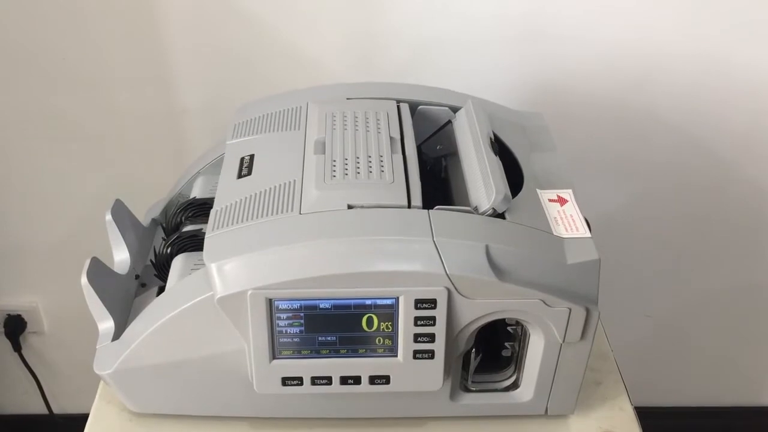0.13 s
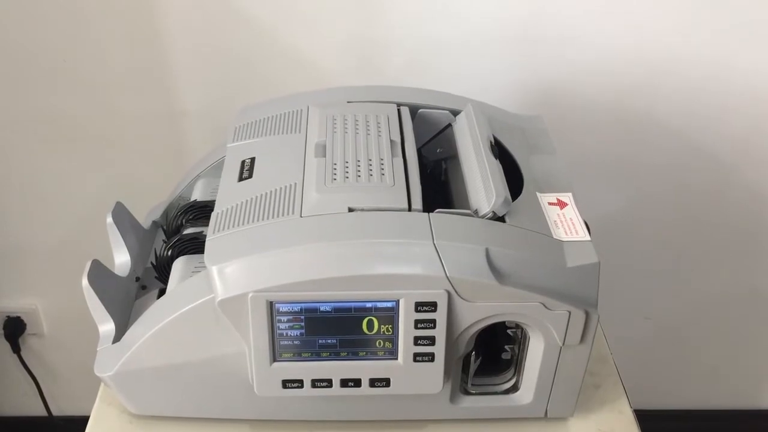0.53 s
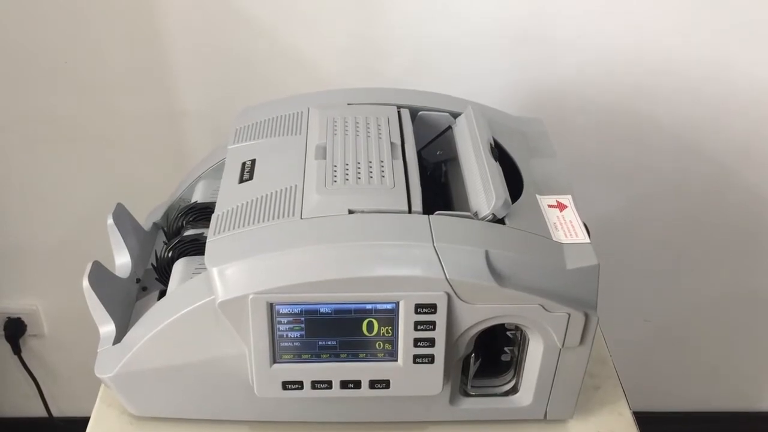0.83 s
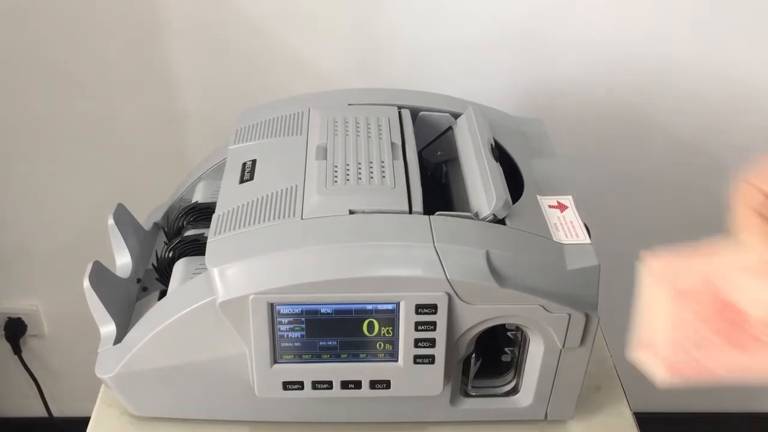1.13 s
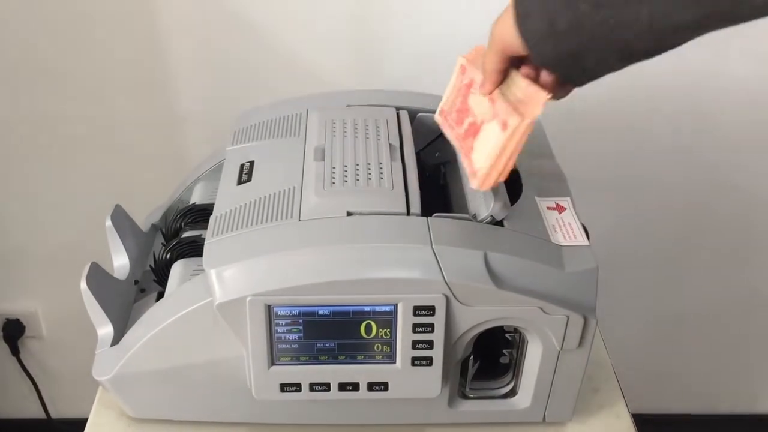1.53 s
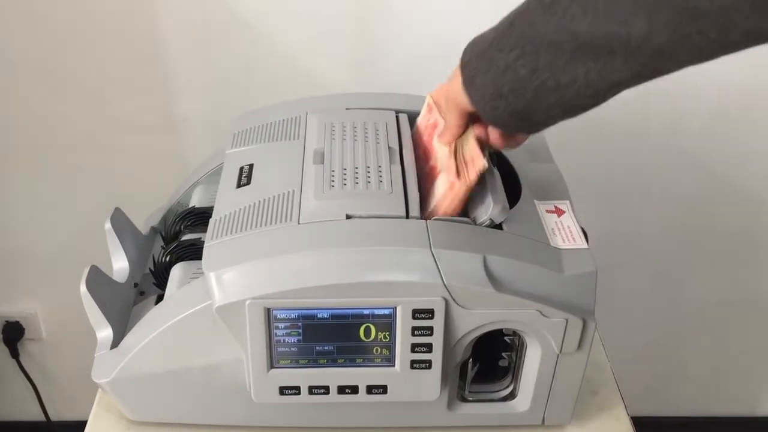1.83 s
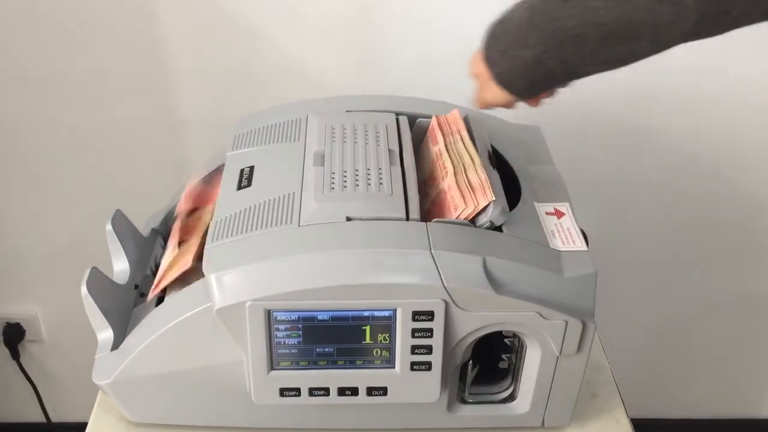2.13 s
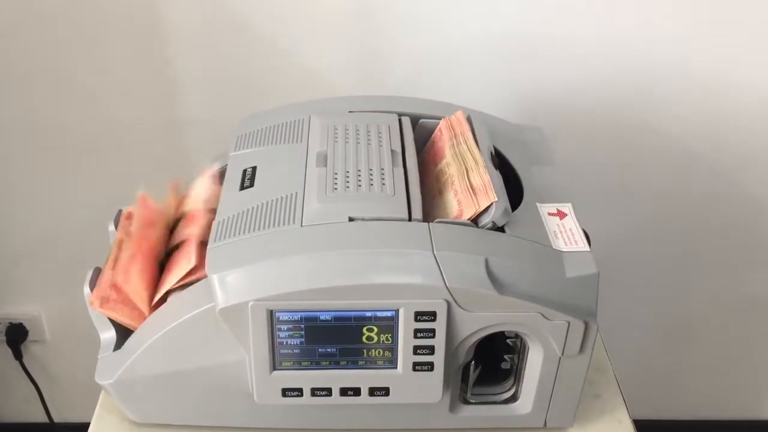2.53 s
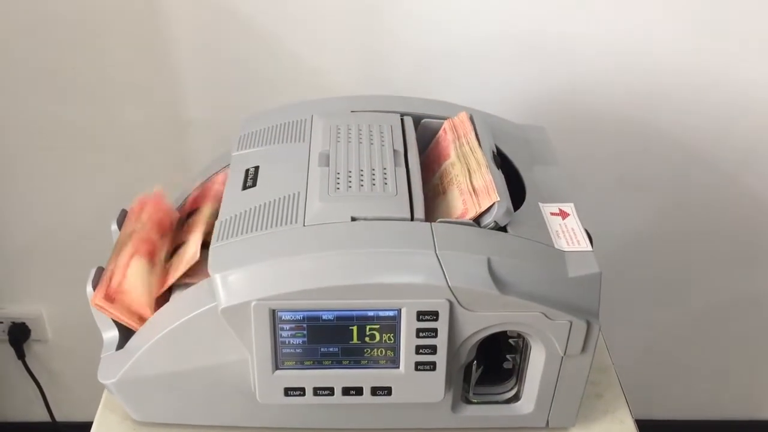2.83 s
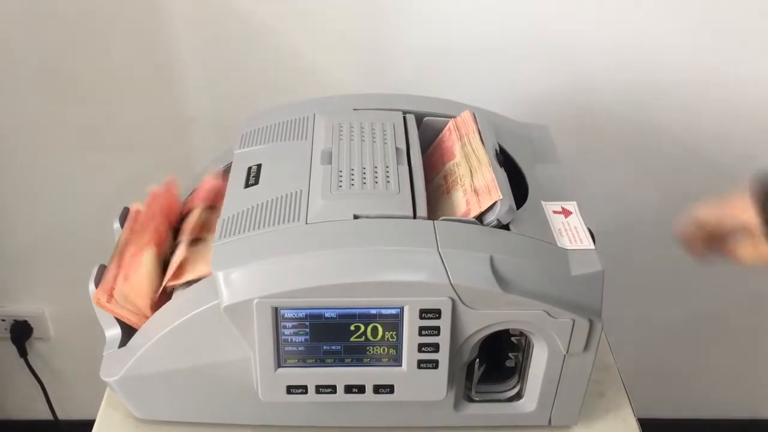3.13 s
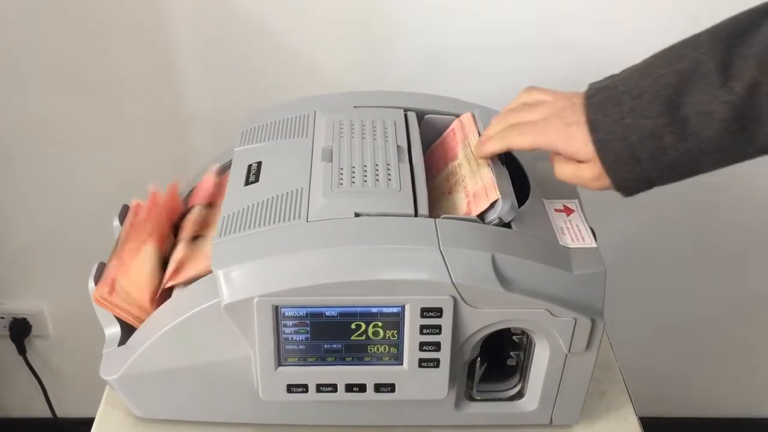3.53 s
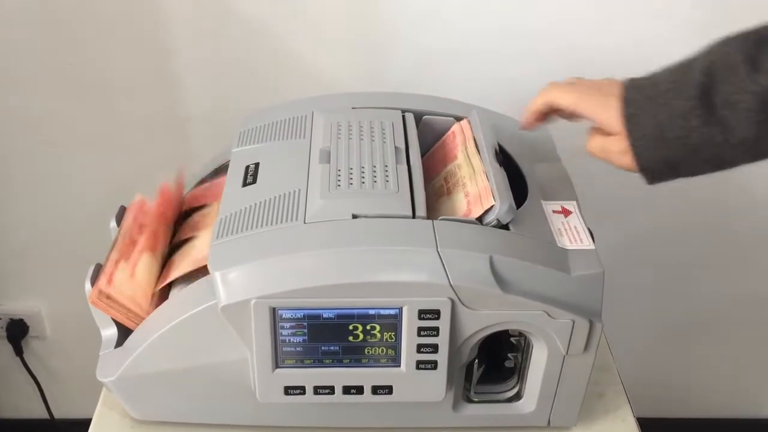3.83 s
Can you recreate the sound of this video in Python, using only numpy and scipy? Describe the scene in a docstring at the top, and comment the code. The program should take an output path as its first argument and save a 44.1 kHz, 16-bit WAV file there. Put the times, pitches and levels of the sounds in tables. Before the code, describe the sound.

Banknote counting machine: soft room hiss and slight rustle first, then two clicks, a brief chirp and motor run-up, followed by steady fast paper snaps and flutter over a low hum, close microphone, short room echo.

```python
"""First a quiet room is heard: low rumble, hiss and a faint whine, with a little rustle of notes in the hand. A
stack of banknotes clicks twice into a counter, the drive chirps and runs up, and about 18 notes a second are
pulled through. Each note snaps free (ringing tones and noise bursts), then hisses over the rollers and flutters
into the stacker wheel (coloured grains of noise). Wavering sine tones make the mains and motor hum and the
roller drone, and filtered noise makes the rumble."""
import sys
import numpy as np
from scipy import signal
from scipy.fft import rfft, irfft
from scipy.io import wavfile
from scipy.ndimage import uniform_filter1d

SR = 44100
rng = np.random.default_rng(int(sys.argv[2]) if len(sys.argv) > 2 else 0)


def file_out(sig):
    """Save sig as 16-bit WAV at sys.argv[1]."""
    # one column per channel
    cols = np.atleast_2d(sig).T
    # limit, then scale
    lim = np.clip(cols, -1, 1)
    pcm = np.round(lim * 32767).astype(np.int16)
    wavfile.write(sys.argv[1], SR, pcm)


N = 176400  # samples: 4 s


def undb(db):
    """Turns decibels into a plain multiplier."""
    return 10 ** (np.asarray(db) / 20)


def unit(x):
    """Scales x to an average (rms) level of 1."""
    return x / np.sqrt(np.mean(x ** 2) + 1e-20)


def clock():
    """The time of every sample, in seconds."""
    return np.arange(N) / SR


def ramp(start_s, length_s):
    """Rises in a straight line from 0 to 1."""
    return np.clip((clock() - start_s) / length_s, 0, 1)


def walk(rate):
    """Slow random drift with a spread near 1: held random values, smoothed twice."""
    hold = max(int(SR / rate), 2)
    steps = np.repeat(rng.standard_normal(N // hold + 1), hold)
    smooth = uniform_filter1d(uniform_filter1d(steps, hold), hold)
    return unit(smooth[:N])


def colour(x, points):
    """Filters x to a spectrum drawn through (pitch_hz, level_db) points; rms 1."""
    hz, db = np.array(points).T
    f = np.maximum(np.arange(N // 2 + 1) * SR / N, 1)
    gain = undb(np.interp(np.log(f), np.log(hz), db))
    # fade out below the first point and above the last
    edges = np.minimum(f / hz[0], 1) * np.minimum(hz[-1] / f, 1) ** 2
    return unit(irfft(rfft(x) * gain * edges, N))


def grains(spread_db):
    """Dense tiny clicks of uneven size."""
    return rng.standard_normal(N) * undb(spread_db * rng.standard_normal(N))


def flicker(x, db, rate):
    """Lets each third of an octave from 400 to 8000 Hz swell and sink on its own, so the colour keeps changing."""
    spectrum = rfft(x)
    f = np.arange(len(spectrum)) * SR / N
    band = np.round(3 * np.log2(np.clip(f, 400, 8000)))  # the end bands take in all beyond them
    return unit(sum(irfft(spectrum * (band == k), N) * undb(db * walk(rate)) for k in np.unique(band)))


def burst(hz, width_hz, decay_s):
    """A contact: noise in one resonance that starts fast and dies away."""
    t = np.arange(4096) / SR
    f = np.arange(1, len(t) // 2 + 2) * SR / len(t)
    resonance = 1 / (1 + 1j * (f - hz * hz / f) / width_hz) ** 2
    tone = irfft(rfft(rng.standard_normal(len(t))) * resonance)
    env = np.exp(-t / decay_s) * np.minimum(t / 0.00032, 1)
    return unit(tone * env) * np.sqrt(np.mean(env ** 2))


def add(out, s, x):
    """Mixes x in at s seconds."""
    i = int(np.clip(s * SR, 0, N))
    out[i:i + len(x)] += x[:N - i]


# notes pulled from the stack: start_s [s], level_db [dB, before the part levels below], pitch_hz [Hz]
NOTES = [(2.2636, -31, 5900), (2.3153, -24.5, 4510), (2.368, -15, 5130), (2.4192, -35, 6290),
         (2.4728, -17.5, 4570), (2.5267, -19, 5500), (2.579, -15.5, 5700), (2.6335, -42, 5700),
         (2.6848, -21.5, 5380), (2.7379, -16, 5400), (2.7911, -19, 5100), (2.8448, -16, 4500),
         (2.8993, -17.5, 4440), (2.9536, -12, 5300), (3.0096, -18, 4480), (3.0623, -9.5, 5630),
         (3.1182, -19, 4330), (3.1764, -21.5, 5500), (3.23, -16, 4440), (3.2855, -14.5, 5700),
         (3.3409, -23, 5260), (3.398, -23, 4490), (3.454, -11.5, 5560), (3.5103, -14.5, 4550),
         (3.568, -12, 5600), (3.6274, -17, 5500), (3.684, -36, 6100), (3.7399, -13.5, 5930),
         (3.7964, -13, 5160), (3.8513, -21, 5560), (3.907, -24, 4870), (3.9617, -14.5, 5400)]


def note_period():
    """Average time from one note to the next, in seconds."""
    return np.mean(np.diff(np.array(NOTES)[:, 0]))


def note_count():
    """Notes passed so far, rising by one from snap to snap and evenly before and after."""
    s = np.array(NOTES)[:, 0]
    t = clock()
    outside = (t - np.clip(t, s[0], s[-1])) / note_period()
    return np.interp(t, s, np.arange(len(s))) + outside


# ringing tones of the note guide: pitch_hz [Hz], level_db [dB, relative], decay_s [s]
GUIDE_TONES = [(1980, -8, 0.0019), (3880, -6.5, .0022), (4480, -3, 0.0052), (5320, -1.5, 0.0035),
               (5870, -3, 0.0031), (6700, -5, 0.0014)]
SNAP_LAG_S, RING_DB, RING_RISE_S, RING_WIDTH_HZ = 0.000977, -25.5, 0.00035, 1600
CRACK_DB, CRACK_DECAY_S = -10.5, 0.00048
EDGE_DB, EDGE_WIDTH_HZ, EDGE_DECAY_S = -8.5, 2940, 0.0019  # the rasp of the paper edge


def guide_ring(pitch_hz):
    """The guide rings in slightly detuned, dying tones, favouring those near the snap's pitch."""
    t = clock()[:2048]
    ring = 0
    for mode_hz, mode_db, decay_s in GUIDE_TONES:
        detune, phase = rng.standard_normal(2)
        nearness = 1 / (1 + ((mode_hz - pitch_hz) / RING_WIDTH_HZ) ** 2)
        tone = np.sin(2 * np.pi * (mode_hz * (1 + 0.01 * detune) * t + phase))
        ring = ring + undb(mode_db) * nearness * tone * np.exp(-t / decay_s)
    return unit(ring * np.minimum(t / RING_RISE_S, 1))


def snaps():
    """Each note's edge cracks free with a rasp and sets the guide ringing."""
    out = np.zeros(N)
    for start_s, level_db, pitch_hz in NOTES:
        s = start_s + SNAP_LAG_S
        add(out, s, undb(level_db + RING_DB) * guide_ring(pitch_hz))
        add(out, s, undb(level_db + CRACK_DB) * burst(12000, 26000, CRACK_DECAY_S))
        add(out, s, undb(level_db + EDGE_DB) * burst(pitch_hz, EDGE_WIDTH_HZ, EDGE_DECAY_S))
    return out


# slaps against wheel and tray: share [part of the average note period], level_db [dB, average],
# pitch_hz [Hz], width_hz [Hz], decay_s [s]
SLAPS = [(.39, -36, 307, 240, 0.0048), (.66, -36, 850, 1100, 0.0037)]
SLAP_SCATTER_DB, SLAP_JITTER_S = 0.5, 0.00296


def slaps():
    """After its snap, each note slaps wheel and tray: short low bursts, slightly uneven in time and level."""
    out = np.zeros(N)
    for start_s, _, _ in NOTES:
        for share, level_db, pitch_hz, width_hz, decay_s in SLAPS:
            late, size = rng.standard_normal(2)
            s = start_s + share * note_period() + SLAP_JITTER_S * late
            add(out, s, undb(level_db + SLAP_SCATTER_DB * size) * burst(pitch_hz, width_hz, decay_s))
    return out


# colour of the paper rubbing over the rollers: pitch_hz [Hz], level_db [dB per Hz, relative]
RUB_COLOUR = [(500, -31), (1400, 1), (1700, 0.5), (1910, 6), (2200, 1.5), (3100, -1.5), (4300, 0),
              (4900, -1.5), (5400, 1.5), (6800, -1), (7600, -6.5), (8600, -5), (10500, -11.5), (11500, -9),
              (15800, -8)]
# colour of the paper fluttering in the wheel: pitch_hz [Hz], level_db [dB per Hz, relative]
FLUTTER_COLOUR = [(250, -40), (450, -8.5), (580, -1.5), (800, 0.5), (1020, -4), (1230, -1.5), (1500, -14),
                  (2000, -13), (4000, -20)]
ON_S = 2.0  # the machine is switched on
RUB_DB, RUB_GRAIN_DB, RUB_BEND_DB, RUB_S, RUB_RISE_S = -36, 3.5, 1.5, 2.098, 0.07
FLUTTER_DB, FLUTTER_GRAIN_DB, FLUTTER_BEND_DB, FLUTTER_S, FLUTTER_RISE_S = -37, 2.5, 1.9, 2.164, 0.039
# louder part of each note's cycle: start share, length share, lift in dB
RUB_PART, FLUTTER_PART = (0.24, 0.38, 2.7), (0.18, 0.585, 3.8)
BENDS_PER_S = 80  # how fast the colour of the bending paper shifts
PAPER_IDLE_DB = -18.5  # while the rollers take hold of the first note


def lift(turns, start, length, db):
    """Makes one part of every note's cycle louder than the rest."""
    share = turns % 1
    inside = (share > start) & (share < start + length)
    return unit(undb(db * uniform_filter1d(1. * inside, size=200)))


def engage(start_s, rise_s):
    """Paper sound begins faintly at switch-on, then rises to full."""
    return np.maximum(undb(PAPER_IDLE_DB) * (clock() > ON_S), ramp(start_s, rise_s))


def paper(turns):
    """Each note rubs over the rollers and flutters into the wheel, its resonances shifting as it bends."""
    rub = flicker(colour(grains(RUB_GRAIN_DB), RUB_COLOUR), RUB_BEND_DB, BENDS_PER_S)
    rub = rub * lift(turns, *RUB_PART) * engage(RUB_S, RUB_RISE_S)
    flutter = flicker(colour(grains(FLUTTER_GRAIN_DB), FLUTTER_COLOUR), FLUTTER_BEND_DB, BENDS_PER_S)
    flutter = flutter * lift(turns, *FLUTTER_PART) * engage(FLUTTER_S, FLUTTER_RISE_S)
    return undb(RUB_DB) * rub + undb(FLUTTER_DB) * flutter


# harder knocks, of notes against the case and, at 3.51 s, a finger on the stack: start_s [s], level_db [dB],
# pitch_hz [Hz]
KNOCKS = [(2.178, -32, 800), (2.223, -31, 920), (2.41, -32, 1900), (3.42, -32, 800), (3.51, -32, 1890)]


def knocks():
    """A few hard knocks, each a burst in one resonance: mostly notes against the case, once a finger on the
    stack."""
    out = np.zeros(N)
    for start_s, level_db, pitch_hz in KNOCKS:
        add(out, start_s, undb(level_db) * burst(pitch_hz, width_hz=830, decay_s=0.0067))
    return out


# level of the roller drone at full run, before its waver: time_s [s], level_db [dB]
DRONE_LEVEL = [(2.33, -41), (2.43, -46), (2.58, -38), (2.9, -42), (3.03, -38.5), (3.36, -58), (3.48, -44.5),
               (3.82, -38.5), (3.9, -51.5)]
# tones of the hum at full run, before their waver: the mains hum at 100 Hz and the motor's tones above it:
# pitch_hz [Hz], level_db [dB]
HUM_TONES = [(100, -45), (284, -51.5), (331, -49.5), (570, -57.5), (683, -55), (915, -55)]
# colour of the rumbling case: pitch_hz [Hz], level_db [dB per Hz, relative]
RUMBLE_COLOUR = [(30, -38), (60, -27), (110, 8.5), (160, -5.5), (220, -2), (300, 4), (400, -4.5),
                 (1500, -15.5)]
DRONE_CYCLES = 7.02  # drone cycles per note
DRONE_WOBBLE_RAD, HUM_WOBBLE_RAD, WOBBLE_DB = 1, 0.26, 2
RUMBLE_DB, IDLE_DB, DRIVE_S, DRIVE_RISE_S = -41.5, -14, 2.06, 0.21


def waver(phase, db, wobble_rad):
    """A sine tone whose level and phase drift a little; phase counts whole cycles."""
    level = np.sqrt(2) * undb(db + WOBBLE_DB * walk(14))
    return level * np.sin(2 * np.pi * phase + wobble_rad * walk(12))


def drive(turns):
    """Mains and motor hum, the swelling roller drone and the rumble of the case run up together."""
    drone_db = np.interp(clock(), *np.array(DRONE_LEVEL).T)
    drone = waver(DRONE_CYCLES * turns, drone_db, DRONE_WOBBLE_RAD)
    hum = sum(waver(hz * clock(), db, HUM_WOBBLE_RAD) for hz, db in HUM_TONES)
    rumble = undb(RUMBLE_DB) * colour(rng.standard_normal(N), RUMBLE_COLOUR)
    run_up = np.maximum(undb(IDLE_DB) * ramp(ON_S, 0.024), ramp(DRIVE_S, DRIVE_RISE_S))
    low_cut = signal.butter(2, 45, "high", fs=SR, output="sos")
    return signal.sosfilt(low_cut, (drone + hum + rumble) * run_up)


CHIRP_S, CHIRP_LENGTH_S, CHIRP_DECAY_S = 2.098, 0.014, 0.0064
CHIRP_HZ, CHIRP_WIDTH_HZ, CHIRP_DB = 1830, 610, -37.5


def chirp():
    """The drive takes up: a narrow band of noise, held briefly and then dying away."""
    edges_hz = [CHIRP_HZ - CHIRP_WIDTH_HZ / 2, CHIRP_HZ + CHIRP_WIDTH_HZ / 2]
    band = signal.butter(2, edges_hz, "band", fs=SR, output="sos")
    noise = unit(signal.sosfilt(band, rng.standard_normal(N)))
    fade = np.exp(-np.maximum(clock() - CHIRP_S - CHIRP_LENGTH_S, 0) / CHIRP_DECAY_S)
    return undb(CHIRP_DB) * noise * ramp(CHIRP_S, .002) * fade


# clicks of handling and loading: start_s [s], level_db [dB], pitch_hz [Hz], width_hz [Hz], decay_s [s]
CLICKS = [(0.874, -48.5, 7600, 15500, 0.0018), (1.9978, -27, 6700, 4770, 0.00092),
          (2.011, -42, 2800, 4525, 0.0047), (2.029, -46.5, 3000, 8000, 0.006),
          (2.0552, -29, 3040, 6840, 0.0025), (2.06, -45.5, 300, 298, 0.014)]
# paper sliding on paper, in the hand and as the rollers first scuff the stack:
# middle_s [s], length_s [s, spread of the swell], level_db [dB]
SWISHES = [(0.58, 0.013, -60), (1.53, .13, -78), (2.144, 0.022, -42.5)]
# colour of the sliding paper: pitch_hz [Hz], level_db [dB per Hz, relative]
SWISH_COLOUR = [(4000, -20), (6500, -2.5), (14000, 2)]


def loading():
    """Notes rustle as swells of bright noise and click into the hopper as short bursts."""
    out = np.zeros(N)
    for start_s, level_db, pitch_hz, width_hz, decay_s in CLICKS:
        add(out, start_s, undb(level_db) * burst(pitch_hz, width_hz, decay_s))
    swell = 0
    for middle_s, length_s, level_db in SWISHES:
        swell = swell + undb(level_db) * np.exp(-((clock() - middle_s) / length_s) ** 2 / 2)
    return out + colour(rng.standard_normal(N), SWISH_COLOUR) * swell


ROOM_T60_S, ECHO_DB = 0.29, -15  # T60: the time the echo takes to fade by 60 dB


def echo(machine):
    """The room answers the machine above 400 Hz with a tail of fading noise."""
    t = clock()[:SR // 2]
    tail = rng.standard_normal(len(t)) * undb(-60 * t / ROOM_T60_S) * (t > .004)
    bright = signal.sosfilt(signal.butter(2, 400, "high", fs=SR, output="sos"), machine)
    return undb(ECHO_DB) * signal.fftconvolve(bright, tail / np.linalg.norm(tail))[:N]


# colour of the quiet room: pitch_hz [Hz], level_db [dB per Hz, relative]
ROOM_COLOUR = [(25, -40), (48, -2.5), (166, -2), (217, 0.5), (320, -6.5), (480, -18), (1800, -22),
               (4300, -32), (10400, -41.5), (16000, -45)]
# rise and fall of the room's low rumble: time_s [s], level_db [dB, relative]
ROOM_LOW = [(0.0, -55.5), (0.28, -52), (0.33, -59.5), (0.7, -52), (0.96, -60.5), (1.22, -54), (1.3, -59.5),
            (1.52, -62.5), (1.62, -56)]
ROOM_DB, WHINE_HZ, WHINE_DB, WHINE_WAVER_DB = -56.5, 1055, -71.5, 3


def room():
    """Low rumble that swells and sinks, steady hiss and a faint, wavering electrical whine."""
    air = colour(rng.standard_normal(N), ROOM_COLOUR)
    low = signal.sosfiltfilt(signal.butter(2, 450, fs=SR, output="sos"), air)
    hiss = air - low
    swell = unit(undb(np.interp(clock(), *np.array(ROOM_LOW).T)))
    whine_level = undb(WHINE_DB + WHINE_WAVER_DB * walk(10.5))
    whine = np.sqrt(2) * np.sin(2 * np.pi * WHINE_HZ * clock()) * whine_level
    return undb(ROOM_DB) * (hiss + low * swell) + whine


def scene():
    """Adds up the machine, its echo and the room, the same in both channels."""
    turns = note_count()
    machine = snaps() + slaps() + paper(turns) + knocks() + drive(turns) + chirp() + loading()
    return np.tile(machine + echo(machine) + room(), (2, 1))


def record(dry):
    """A microphone with a steep top cut at 15850 Hz."""
    top_cut = signal.ellip(10, .2, 80, 15850, fs=SR, output="sos")
    return signal.sosfilt(top_cut, dry)


dry = scene()
out = record(dry)
file_out(out)
```